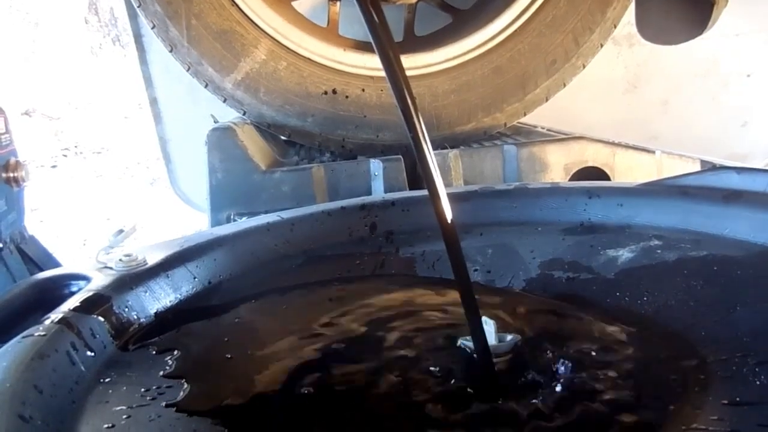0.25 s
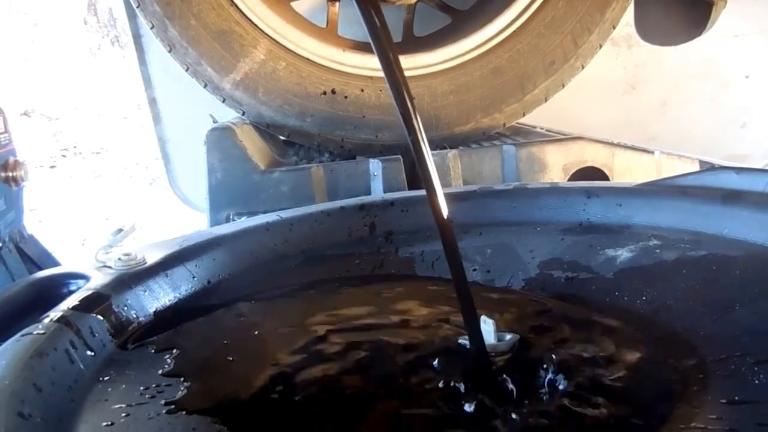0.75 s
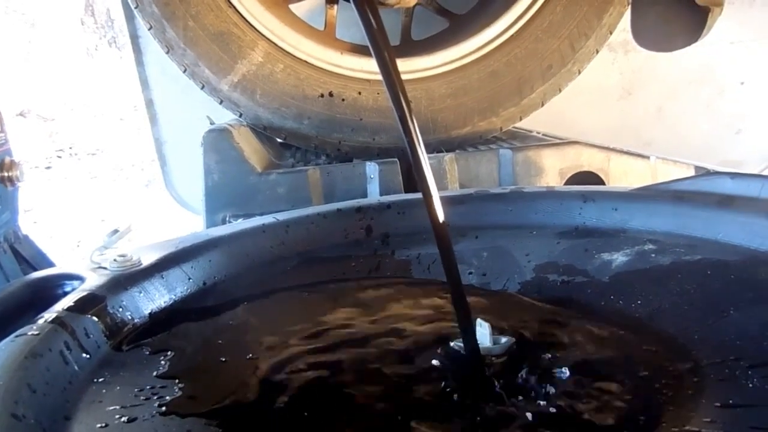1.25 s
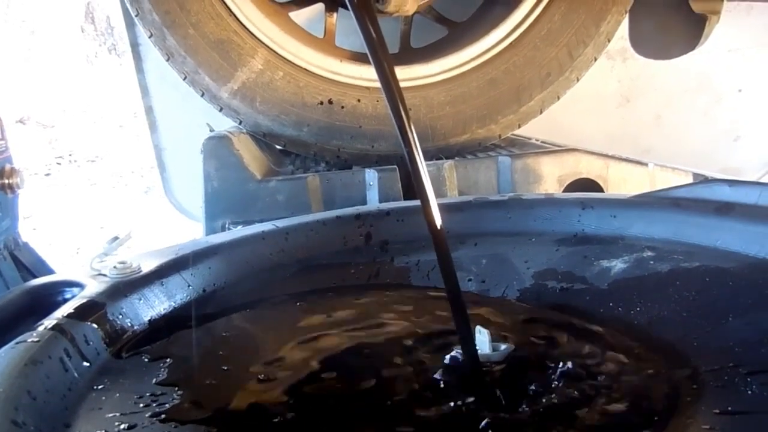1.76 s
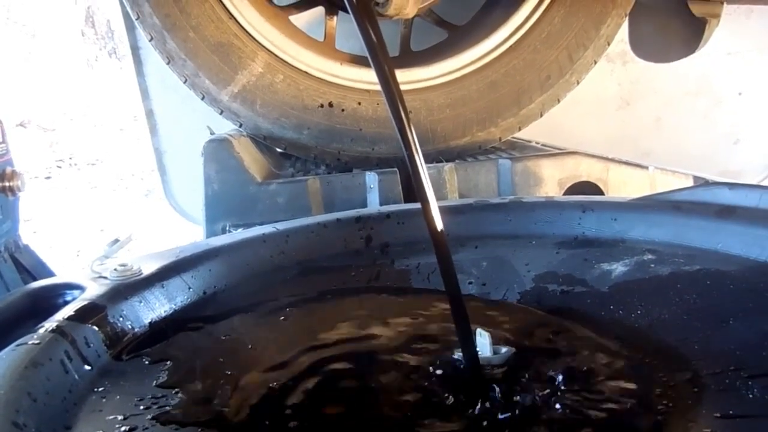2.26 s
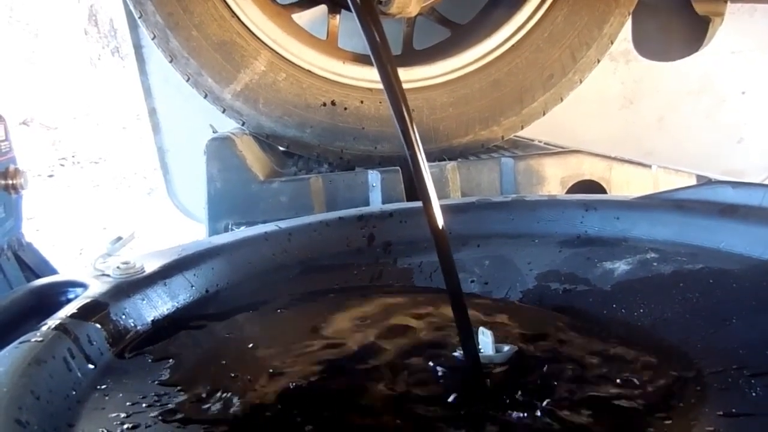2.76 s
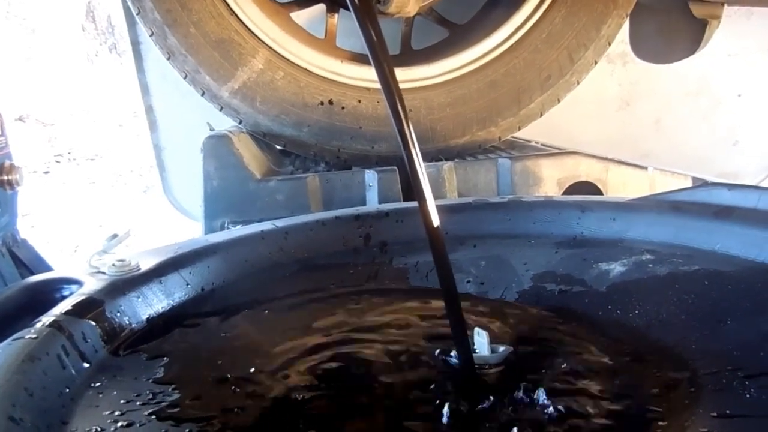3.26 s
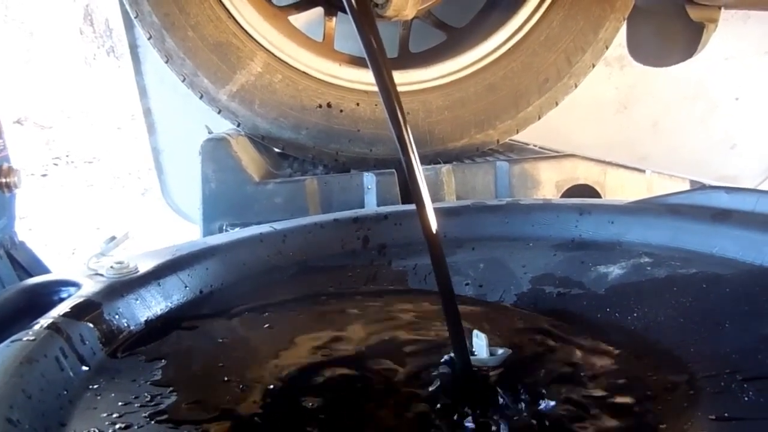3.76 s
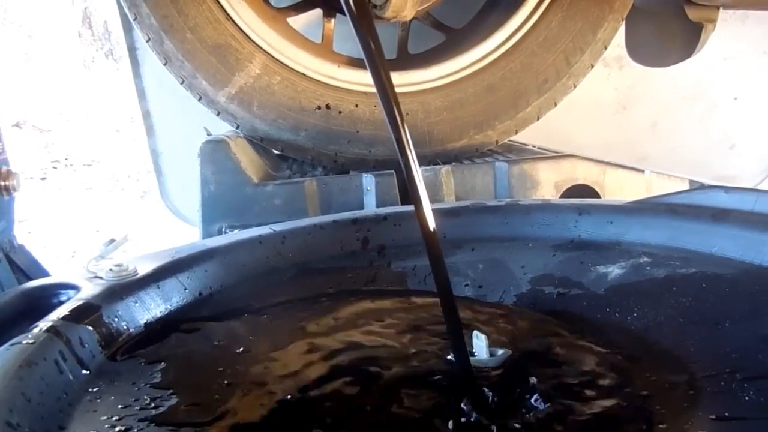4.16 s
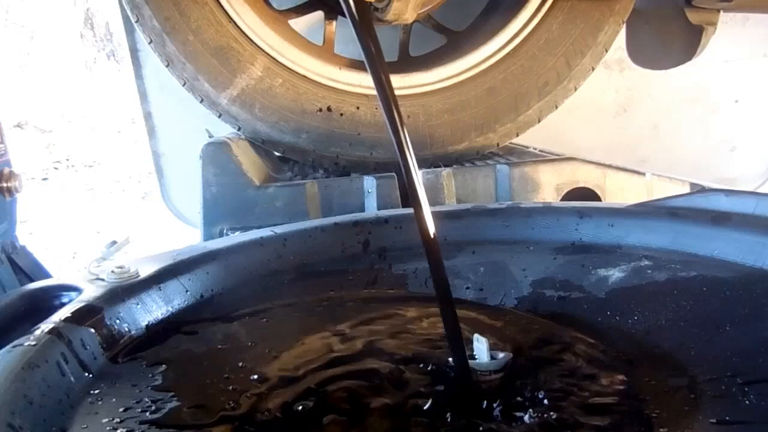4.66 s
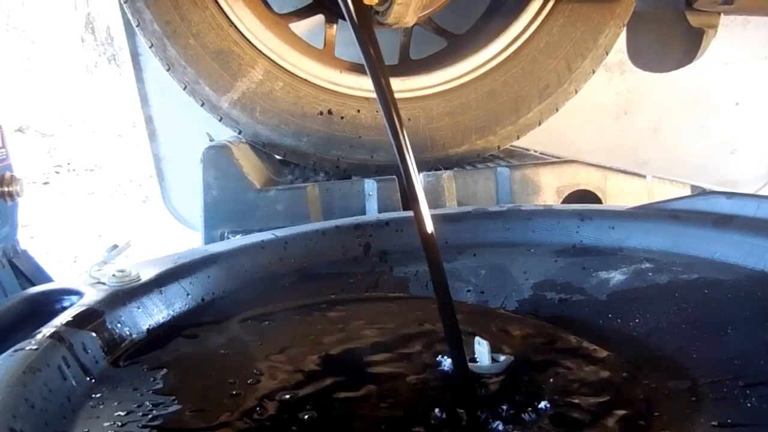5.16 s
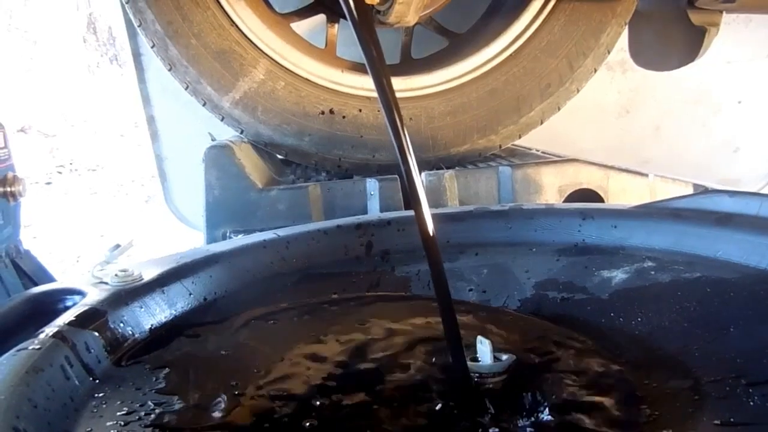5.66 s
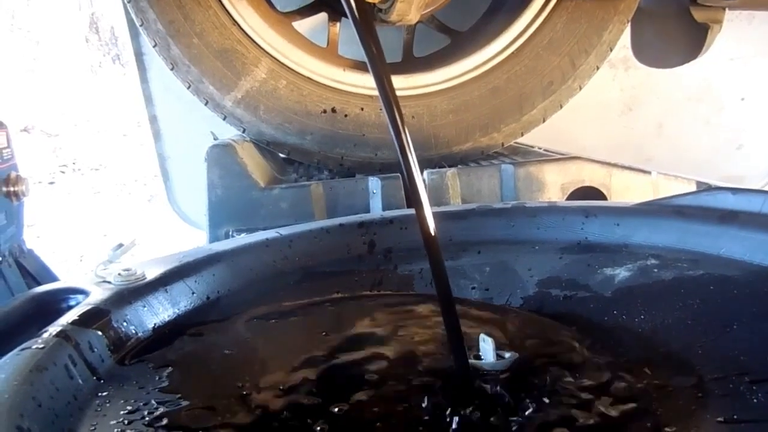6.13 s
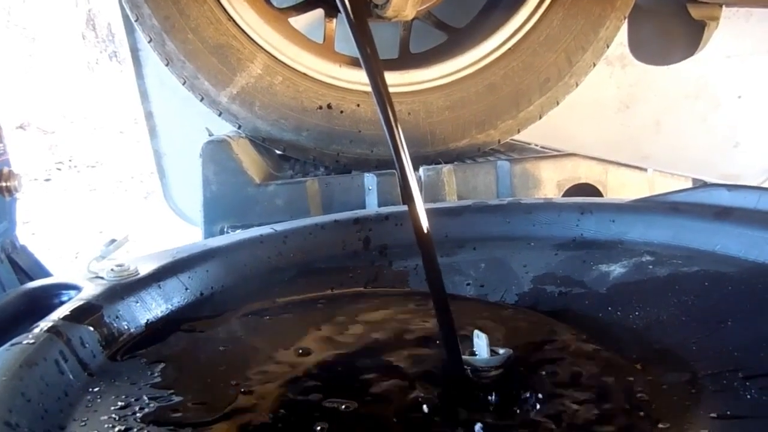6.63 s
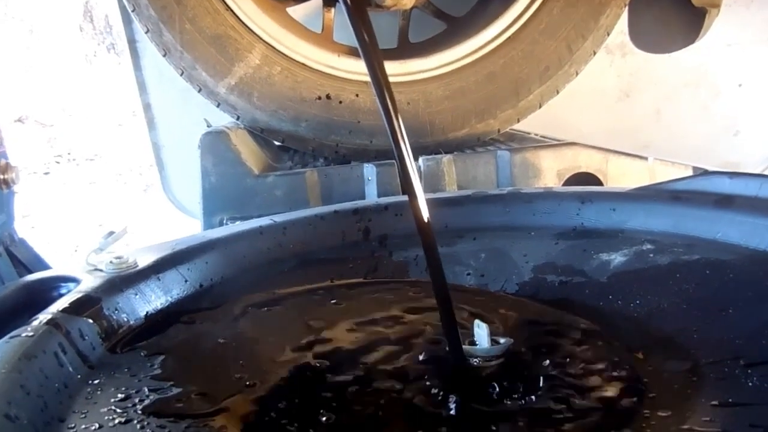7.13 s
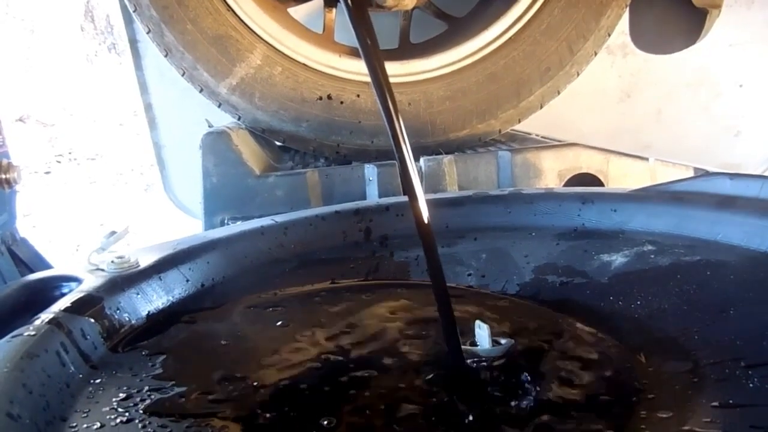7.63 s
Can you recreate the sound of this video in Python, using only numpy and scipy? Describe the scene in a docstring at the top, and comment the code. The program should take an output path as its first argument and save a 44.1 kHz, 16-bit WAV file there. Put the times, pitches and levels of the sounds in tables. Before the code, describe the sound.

A continuous stream of thin oil falls into a half-full plastic pan beneath a car. Fine hissing spray and lower gurgling churn swell in irregular slaps, dotted with short, bright bubble plinks and occasional hollow bloops. The pan adds a slight ring and the car's underside gives tight, diffuse echoes. A close stereo microphone catches low draught rumble, stronger on the left.

```python
"""Uneven slapping bursts of spray and churn, ringing bubble pops, close echoes and a buffeting draught:
a thick stream of thin oil falls from an engine sump into a half-full plastic drain pan under a car.
Splash: swarms of tiny bubbles plus noise, swelled by flow and slaps. Large bubbles: rising, dying tones.
The pan adds resonances, the car's underside adds close, diffuse echoes;
low rumble noise, gusts and short dents make the draught, strongest at the left port."""
import sys
import numpy as np
from scipy import signal
from scipy.fft import rfft, irfft, next_fast_len
from scipy.io import wavfile
from scipy.ndimage import map_coordinates

SR = 44100
rng = np.random.default_rng(int(sys.argv[2]) if len(sys.argv) > 2 else 0)


def dump_mix(stems):
    """Bounce the given channels to the path in sys.argv[1] as a 16-bit WAV at rate SR."""
    frames = np.atleast_2d(stems).T  # one column per channel
    limited = np.clip(frames, -1, 1)  # hard clip at full scale
    pcm = np.round(limited * 32767).astype(np.int16)
    wavfile.write(sys.argv[1], SR, pcm)


N = 347949


def amp(db):
    """Gain of a level in dB."""
    return 10 ** (np.asarray(db) / 20)


def unit(x):
    """Scaled to rms 1."""
    return x / np.sqrt(np.mean(x ** 2) + 1e-20)


def along(points, hz):
    """(Hz, value) points interpolated on a log frequency axis."""
    f, v = np.transpose(points)
    return np.interp(np.log(hz + 1), np.log(f + 1), v)


def curves(rows):
    """One value per sample for each column after the time."""
    s, *cols = np.transpose(rows)
    return [np.interp(np.arange(N) / SR, s, c) for c in cols]


def wobble(rate_hz):
    """Smooth random curve, rate_hz knots a second."""
    knots = rng.standard_normal(int(N * rate_hz / SR) + 4)
    return map_coordinates(knots, [np.arange(N) * rate_hz / SR])


def filtered(x, response):
    """x through a complex frequency response."""
    m = next_fast_len(N + SR // 2)
    hz = np.fft.rfftfreq(m, 1 / SR)
    return irfft(rfft(x, m) * response(hz), m)[..., :N]


def alike_gains(likeness):
    """Mid and side gains that give a left-right likeness."""
    turn = np.arccos(np.clip(likeness, -1, 1)) / 2
    return np.cos(turn), np.sin(turn)


def draught():
    """Low rumble noise; gusts build slowly, drop fast and favour the left; eddies dent the left membrane."""
    # gust peaks: (time [s], level [dB])
    gust_peaks = [(0.12, -53), (0.55, -49), (1.15, -49.5), (2.1, -44), (2.55, -38.5), (3.25, -52),
                  (4.0, -47), (4.5, -40), (4.96, -39.5), (5.22, -39.5), (5.6, -44.5), (6.05, -43.5),
                  (6.78, -38)]
    # rumble spectrum: (frequency [Hz], relative level [dB])
    rumble_spectrum = [(15, -21), (30, -7.5), (70, 0.5), (160, -6), (300, -12.5), (500, -17.5), (900, -57)]
    # eddy dents; close rows together make one longer swing: (time [s], relative level [dB])
    eddies = [(0.117, -29), (1.139, -28), (1.922, -16.5), (2.058, -26), (2.3818, -16), (2.444, -11),
              (2.486, -17.5), (2.49, -18.5), (2.56, -17.5), (2.627, -19.5), (3.948, -26), (4.258, -29),
              (4.328, -27.5), (4.455, -24), (4.491, -27), (4.506, -27), (4.532, -25), (4.708, -20.5),
              (4.795, -30), (4.878, -28), (4.959, -15), (5.118, -28), (5.189, -23.5), (5.2076, -23),
              (5.236, -23.5), (6.553, -24), (6.595, -18), (6.667, -23), (6.725, -9.5), (6.728, -16.5),
              (6.7802, -19.5), (6.7852, -19.5), (6.8835, -24), (6.8947, -22)]
    build_db_per_s, drop_db_per_s = 15, 63
    calm_db, right_gust_db = -51.5, -4.5
    widest_ms, sharpen_db_per_db, sharp_from_db = 1.86, 0.61, -20  # louder dents are narrower

    peak_s, peak_db = np.transpose(gust_peaks)[..., None]
    after_s = np.arange(N) / SR - peak_s
    fall_db = np.where(after_s < 0, -build_db_per_s * after_s, drop_db_per_s * after_s)
    gust = amp((peak_db - fall_db).max(axis=0))

    noise = amp(4.06 * wobble(30)) * rng.standard_normal((3, N))
    coloured = filtered(noise, lambda hz: amp(along(rumble_spectrum, hz)))
    shared, left, right = map(unit, coloured)
    calm = amp(calm_db) * shared * amp([[2.5], [-2.5]])
    gusts = gust * np.array([left, amp(right_gust_db) * (right + 0.41 * left)])

    half = 600
    dents = np.zeros(N + SR)
    t_ms = np.arange(-half, half) / SR * 1000
    for s, db in eddies:
        u = t_ms / widest_ms * amp(sharpen_db_per_db * max(db - sharp_from_db, 0))
        # deep dip between two opposite swings, the second larger
        dent = (u * u - 1 + 0.21 * u) * np.exp(-u * u / 2)
        dents[round(s * SR) - half:][:len(u)] += amp(db) * dent
    return calm + gusts + dents[:N] * amp([[0.5], [-19]])


def echo_tails(count):
    """Answers of close hard surfaces: noise whose decay time and left-right likeness vary with frequency."""
    # echo decay: (frequency [Hz], T60 [s])
    decay = [(500, 0.064), (2000, 0.056), (5000, 0.036), (12000, 0.051)]
    # echo likeness: (frequency [Hz], left-right likeness [0-1])
    echo_likeness = [(500, 0.99), (1500, 0.28), (5000, 0.46)]
    hz, t, z = signal.stft(rng.standard_normal((2, count, SR // 6)), SR, nperseg=64)
    mid_gain, side_gain = alike_gains(along(echo_likeness, hz)[:, None])
    mid, side = z[0] * mid_gain, z[1] * side_gain
    fade = amp(-60 * t / along(decay, hz)[:, None])
    tails = signal.istft(np.array([mid + side, mid - side]) * fade, SR, nperseg=64)[1]
    return tails / np.linalg.norm(tails[:1], axis=2, keepdims=True)  # left energy 1


def underside(x):
    """Underside echoes: overlapping pieces each get a freshly drawn tail, so no one random colour stands out."""
    hop = SR // 4
    count = N // hop + 2
    padded = np.pad(x, (hop + 70, 2 * hop))  # 70 samples of echo delay
    out = np.zeros((2, N + 2 * SR))
    window = np.sin(np.pi * np.arange(2 * hop) / (2 * hop))
    for k, tail in enumerate(np.swapaxes(echo_tails(count), 0, 1)):
        piece = padded[k * hop:][:2 * hop] * window
        answer = signal.fftconvolve(piece[None], tail, axes=1)
        out[:, k * hop:][:, :answer.shape[1]] += answer
    return out[:, hop:hop + N]


def pan(hz):
    """Response of the pan and air gap: all passes, resonances are added."""
    # resonances: (centre [Hz], width [Hz], relative level [dB])
    modes = [(550, 106, 0), (928, 34, 1.5), (1280, 23, 1.5), (2724, 640, 1.5), (3406, 46, 4.5),
             (3955, 160, -4), (5710, 110, -9)]
    resonances = sum(amp(db) * 1j * hz * w / (c * c - hz * hz + 1j * hz * w) for c, w, db in modes)
    return 1 + 0.78 * resonances


def rings(s, hz, db, life_s, rise, size):
    """Bubbles: tones with a quick onset that climb in pitch as they near the surface, then die."""
    t = np.arange(size) / SR
    u = t / life_s[:, None]
    hz = hz[:, None]
    # pitch is up by the fraction `rise` after one life
    phase = 2 * np.pi * hz * t * (1 + rise[:, None] * np.minimum(u, 2) ** 2 / 3)
    envelope = (1 - np.exp(-t * hz * 1.2)) * np.exp(-u ** 2)
    tone = amp(db)[:, None] * np.sin(phase) * envelope
    at = np.round(s * SR).astype(int)[:, None] + np.arange(size)
    return np.bincount(at.ravel(), tone.ravel(), N + size)[:N]


def bubbles():
    """Large trapped bubbles: higher ones ring shorter, the heaving surface flutters them, the pan hums."""
    # ringing bubbles: (time [s], pitch [Hz], relative level [dB])
    pops = [(0.104, 6460, -24.5), (0.283, 1060, -16.5), (0.3184, 10200, -20.5), (0.377, 903, -29),
            (0.434, 4480, -20), (0.493, 4570, -20.5), (0.5424, 5640, -13), (0.601, 940, -28),
            (0.606, 4280, -19), (0.65, 8200, -20), (0.6737, 7150, -19.5), (0.7187, 3710, -12.5),
            (0.879, 1230, -23), (0.879, 3500, -21.5), (0.9017, 4370, -11), (0.9163, 3310, -18.5),
            (1.0955, 4740, -10), (1.102, 916, -25), (1.226, 880, -20), (1.25, 2740, -24.5),
            (1.309, 964, -31), (1.4851, 5830, -13.5), (1.488, 3600, -16), (1.488, 1095, -21.5),
            (1.489, 8400, -15.5), (1.594, 1040, -22), (1.707, 980, -23), (1.756, 4100, -22.5),
            (1.8868, 4220, -21.5), (1.9106, 1010, -19), (1.924, 5630, -23), (2.056, 877, -22.5),
            (2.0595, 5170, -21), (2.2742, 7160, -12.5), (2.3084, 3840, -14), (2.3113, 6540, -16.5),
            (2.3922, 1590, -19.5), (2.4514, 5600, -19.5), (2.5401, 3400, -16.5), (3.012, 8700, -22.5),
            (3.039, 775, -23.5), (3.066, 1200, -21), (3.109, 3960, -21), (3.213, 1124, -22),
            (3.3616, 6700, -15), (3.4605, 4270, -15.5), (3.559, 6700, -16), (3.599, 3860, -12.5),
            (3.645, 3850, -20.5), (3.7304, 10900, -20.5), (3.753, 3300, -24), (3.804, 6200, -16.5),
            (3.8487, 3750, -14), (3.884, 4060, -18), (3.906, 5170, -14.5), (3.951, 1416, -14.5),
            (4.011, 1060, -23.5), (4.176, 910, -23.5), (4.194, 3660, -19.5), (4.2588, 4130, -12.5),
            (4.3233, 4380, -17.5), (4.3634, 8340, -22), (4.466, 6970, -19), (4.468, 3940, -7),
            (4.58, 3730, -20.5), (4.626, 6900, -16), (4.65, 4850, -17), (4.719, 3860, -25),
            (4.7572, 964, -15.5), (4.8508, 5300, -20.5), (4.8875, 3440, -13), (4.97, 2650, -23.5),
            (5, 4200, -19), (5.1167, 9060, -17.5), (5.2063, 3870, -8.5), (5.267, 3740, -13.5),
            (5.34, 3900, -23), (5.37, 4170, -19.5), (5.4773, 4030, -17), (5.685, 2720, -27.5),
            (5.8303, 2020, -19), (5.8354, 5200, -19), (5.925, 5740, -13.5), (5.9899, 3640, -17.5),
            (6.0198, 4400, -13), (6.022, 2840, -19), (6.023, 3720, -14), (6.0337, 3970, -11),
            (6.065, 3400, -10), (6.271, 1230, -22), (6.272, 4240, -18), (6.273, 6500, -11.5),
            (6.3446, 6500, -15.5), (6.448, 3940, -16), (6.564, 2590, -23.5), (6.593, 1155, -21.5),
            (6.6338, 5100, -14.5), (6.726, 4500, -17.5), (6.891, 1720, -21), (6.939, 1270, -26.5),
            (7.0734, 5660, -17), (7.3273, 3160, -13.5), (7.337, 4300, -20.5), (7.429, 3380, -25),
            (7.6586, 6400, -17.5), (7.705, 3470, -22), (7.796, 4700, -24.5), (7.855, 1140, -25)]
    # bursting at the surface: (time [s], start pitch [Hz], relative level [dB], life [ms], rise per life [1])
    sweeps = [(1.73, 2970, -32.5, 8.3, 0.47), (3.752, 2980, -21, 9.7, 0.69),
              (7.386, 2600, -28.5, 8.5, 0.72), (7.594, 4100, -29, 20, 0.72)]
    life_ms_at_1k, life_power, max_rise = 4.3, 0.74, 0.28
    twin_db = -6.5  # each bubble sheds a fainter twin of nearby pitch

    s, hz, db = np.transpose(pops)
    life_s = life_ms_at_1k / 1000 * (hz / 1000) ** -life_power
    climb, later, apart = rng.random((len(s), 3)).T
    firsts = rings(s, hz, db, life_s, max_rise * climb, size=1500)
    twin_s = s + 2 * later * life_s
    twin_hz = hz * (0.88 + 0.24 * apart)
    twins = rings(twin_s, twin_hz, db + twin_db, 1.5 * life_s, max_rise * later, size=1500)

    s, hz, db, life_ms, rise = np.transpose(sweeps)
    bursts = rings(s, hz, db, life_ms / 1000, rise, size=1500)
    flutter = amp(2.5 * wobble(900))
    return filtered(flutter * (firsts + twins + bursts), pan) * amp(-3.0)


def swarm(count, cycles, range_db, lo_hz, hi_hz, size):
    """Many small bubbles of random time, pitch and strength, mostly faint, rms 1; life in cycles."""
    when, pitch, big, rise = rng.random((count, 4)).T
    hz = lo_hz * (hi_hz / lo_hz) ** pitch
    db = range_db * big ** 2 + 10 * np.log10(hz)
    return unit(rings(when * (N - 1) / SR, hz, db, cycles / hz, 0.15 * rise, size))


def spread(pair, spectrum):
    """Two unrelated signals, coloured by spectrum and pan, mixed to left and right, rms 1."""
    # likeness: (frequency [Hz], left-right likeness [0-1])
    likeness = [(300, 1), (640, 0.97), (1400, 0.89), (3100, 0.65), (6800, 0.54), (13000, 0.16)]

    def colour(hz):
        return amp(along(spectrum, hz)) * pan(hz) * np.array(alike_gains(along(likeness, hz)))

    mid, side = filtered(pair, colour)
    return unit(np.array([mid + side, mid - side]))


def slaps():
    """Spray and churn strength as lumps of the stream slap the pool: crisp front, then a fade."""
    # slaps: (time [s], relative spray level [dB], relative churn level [dB])
    lumps = [(0.153, -40, -71), (0.305, -42, -59), (0.38, -33, -34), (0.57, -42, -36.5),
             (0.603, -35.5, -52), (0.662, -35.5, -44), (0.74, -37.5, -43), (0.852, -43, -34.5),
             (1.051, -39, -63), (1.08, -33.5, -42), (1.219, -48, -42.5), (1.24, -38, -75),
             (1.301, -51, -71), (1.366, -38, -67), (1.483, -36.5, -44), (1.613, -79, -36.5),
             (1.7, -32.5, -39.5), (1.505, -31.5, -64), (1.817, -44, -44), (1.849, -37, -56),
             (1.886, -37, -65), (2.061, -27.5, -36.5), (2.257, -35, -32.5), (2.305, -32, -43),
             (2.333, -38.5, -50), (2.447, -38, -49), (2.518, -45, -39), (2.799, -38, -43),
             (3.008, -42, -74), (3.036, -43, -55), (3.101, -39.5, -43), (3.15, -38.5, -47),
             (3.305, -37, -35), (3.351, -31.5, -50), (3.45, -34, -39), (3.556, -42.5, -57),
             (3.598, -39, -39), (3.746, -40, -40), (3.895, -35, -39), (4.012, -35.5, -36),
             (4.137, -38, -43), (4.179, -41, -60), (4.461, -32.5, -36.5), (4.622, -33, -39),
             (4.643, -35, -57), (4.682, -33.5, -41.5), (4.756, -39.5, -32.5), (4.868, -41.5, -43),
             (4.922, -37, -42), (5.115, -33, -46), (5.195, -36.5, -35), (5.269, -38, -70),
             (5.335, -29, -45), (5.531, -37.5, -55), (5.828, -33.5, -36), (5.985, -36.5, -56),
             (6.015, -28, -35), (6.125, -36, -67), (6.266, -33, -30), (6.438, -37.5, -48),
             (6.56, -35, -40.5), (6.625, -38.5, -41), (6.697, -32.5, -36), (6.755, -35, -67),
             (6.804, -40, -57), (6.863, -43, -39), (6.931, -40.5, -45), (7.086, -43, -64),
             (7.287, -43, -38.5), (7.323, -63, -42), (7.378, -49, -39.5), (7.477, -37.5, -44),
             (7.594, -51, -49), (7.647, -34, -71), (7.67, -40, -67), (7.782, -37, -50), (7.851, -81, -35.5)]
    attack_s, spray_t60_s, churn_t60_s, crisp_t60_s = 0.0017, 0.18, 0.16, 0.041
    s, *db = np.transpose(lumps)
    t = np.arange(SR // 4) / SR
    starts = np.zeros((2, N))
    starts[:, np.round(s * SR).astype(int)] = amp(db)
    fade = amp(-60 * t / [[spray_t60_s], [churn_t60_s]])
    front = (1 - np.exp(-t / attack_s)) * (1 + 0.53 * amp(-60 * t / crisp_t60_s))
    return np.abs(signal.fftconvolve(starts, fade * front, axes=1)[:, :N])


def splash():
    """Fine spray and droplet ticks above, coarse churn below, smooth wash; slaps and surges swell them."""
    # stream between slaps: (time [s], relative spray level [dB])
    flow = [(0.0, -47.5), (0.61, -44), (2.2, -44.5), (2.48, -39.5), (3.05, -48.5), (4.88, -45), (5.93, -44),
            (7.89, -49)]
    # spray spectrum: (frequency [Hz], relative level [dB])
    spray_spectrum = [(700, -122), (1500, -9.5), (2200, -14.5), (4300, -7.5), (7000, -10.5), (12300, -17),
                      (13600, -22), (14500, -35), (16400, -50)]
    # churn spectrum: (frequency [Hz], relative level [dB])
    churn_spectrum = [(200, -0.5), (320, -11.5), (550, -8.5), (900, -0.5), (1300, 0.5), (1900, -7),
                      (3000, -15.5), (6000, -59)]
    churn_over_spray_db, churn_follows = 3.5, 0.37  # at mean flow; share of the flow's swings
    bright_hz, brightens_db_per_db = 6850, 0.41  # above bright_hz the spray swings wider
    wash_db = -10  # relative to the flow

    flow_db, = curves(flow)
    mean_db = flow_db.mean()
    churn_db = mean_db + churn_over_spray_db + churn_follows * (flow_db - mean_db)
    spray_slaps, churn_slaps = slaps()
    surge_db = 1.6 * wobble(45) + 1.2 * wobble(110)
    spray = (amp(flow_db + 2.4 * wobble(12)) + spray_slaps) * amp(surge_db)
    churn = (amp(churn_db) + churn_slaps) * amp(0.82 * surge_db + 0.57 * wobble(23))

    fine, coarse = [], []
    for _ in range(2):
        mist = swarm(count=15000, cycles=8, range_db=10.5, lo_hz=1500, hi_hz=15160, size=320)
        ticks = swarm(count=900, cycles=0.33, range_db=8, lo_hz=6100, hi_hz=11900, size=30)
        fine.append(mist + 0.14 * ticks)
        coarse.append(swarm(count=5500, cycles=2.6, range_db=9, lo_hz=300, hi_hz=2400, size=700))
    hiss = 0.65 * rng.standard_normal((2, 2, N))
    drops = spread(fine + hiss[0], spray_spectrum)
    lumpy = spread(coarse + hiss[1], churn_spectrum)

    top = filtered(drops, lambda hz: 1 / (1 + (bright_hz / (hz + 1)) ** 4))
    flicker = amp(3 * wobble(14) + 3 * wobble(40))
    sputter = unit(unit(spray) ** brightens_db_per_db * flicker)
    smooth = spread(rng.standard_normal((2, N)), spray_spectrum)
    wash = filtered(smooth, lambda hz: 1 / (1 + (hz / bright_hz) ** 4))
    return amp(flow_db + wash_db) * wash + spray * (drops + (sputter - 1) * top) + churn * lumpy


def scene():
    """Bubbles and splash with their close echoes, draught on top."""
    pops, pour = bubbles(), splash()
    echoes = underside(amp(-4.5) * pops + amp(-7) * pour.mean(axis=0))
    return pops * amp([[-0.6], [0.6]]) + pour + echoes + draught()


def record(dry):
    """Left port lags the right by 0.6 sample, being a little farther off; band-limited."""
    lag_s, top_hz = 0.6 / SR, 16300
    sides = np.array([[-1], [1]])
    return filtered(dry, lambda hz: (hz < top_hz) * np.exp(1j * np.pi * hz * lag_s * sides))


dry = scene()
out = record(dry)
dump_mix(out)
```